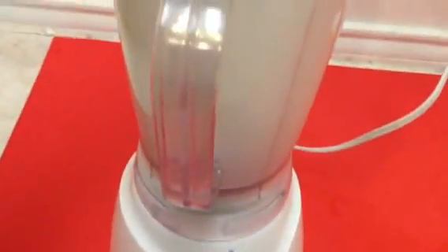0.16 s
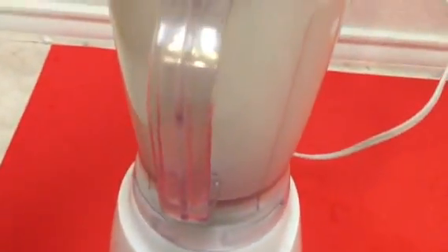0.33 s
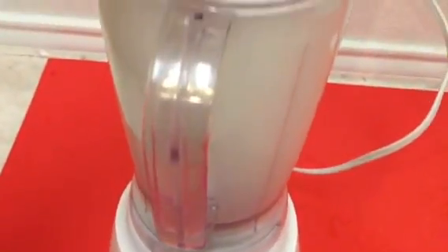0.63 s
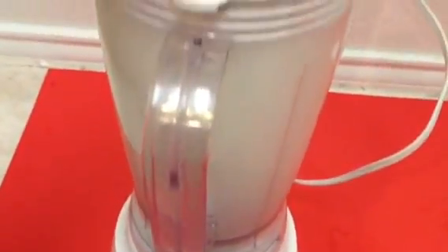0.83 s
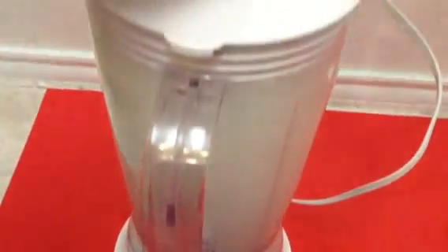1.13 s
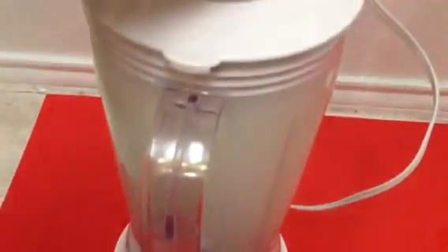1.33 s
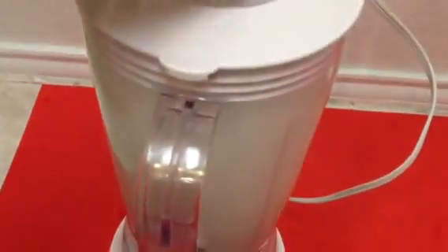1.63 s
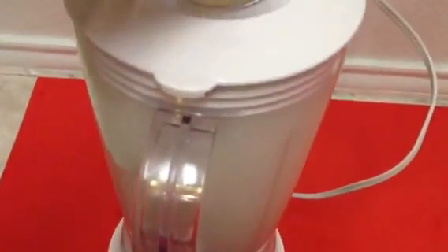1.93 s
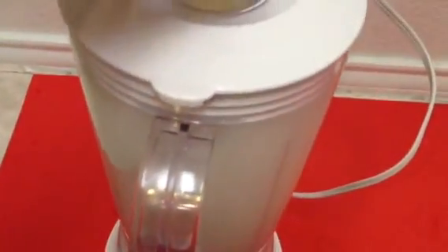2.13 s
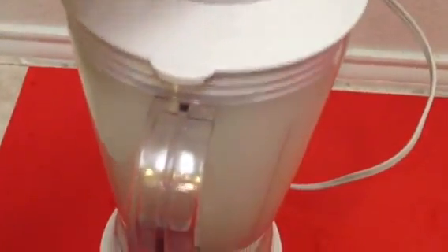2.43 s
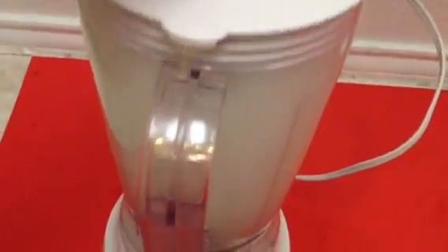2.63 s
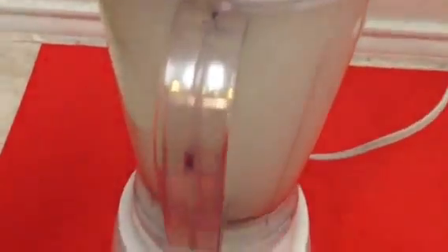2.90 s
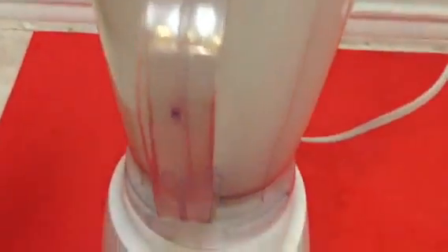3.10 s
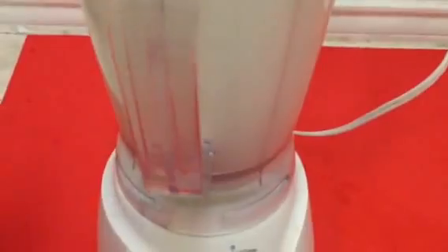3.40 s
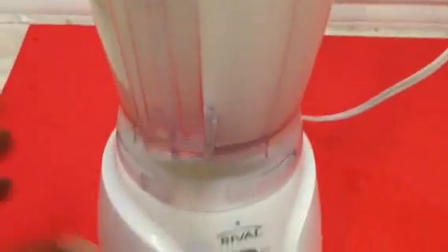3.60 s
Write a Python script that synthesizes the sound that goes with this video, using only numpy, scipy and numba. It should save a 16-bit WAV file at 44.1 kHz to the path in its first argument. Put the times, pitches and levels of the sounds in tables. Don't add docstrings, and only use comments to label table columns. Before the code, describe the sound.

A countertop blender runs steadily close by, motor whining over a loud rushing churn of liquid.

```python
import sys
import numpy as np
from scipy import signal
from scipy.fft import rfft, irfft
from scipy.io import wavfile
from scipy.ndimage import uniform_filter1d
from numba import njit

SR = 44100
rng = np.random.default_rng(int(sys.argv[2]) if len(sys.argv) > 2 else 0)


def transcribe(signal):
    frames = np.atleast_2d(signal).T
    limited = np.clip(frames, -1, 1)
    pcm = np.round(limited * 32767).astype(np.int16)
    wavfile.write(sys.argv[1], SR, pcm)


def to_linear_factor(level_db):
    exponent = np.asarray(level_db, float) / 20
    return 10 ** exponent


N = 165375


def unit(x):
    return x / np.sqrt(np.mean(x ** 2))


@njit
def svf(x, hz, width):
    y, band, low = np.empty(len(x)), 0., 0.
    for i in range(len(x)):
        g = np.tan(np.pi * hz[i] / SR)
        damping = width / hz[i]
        v = (band + g * (x[i] - low)) / (1 + g * (g + damping))
        band, low = 2 * v - band, low + 2 * g * v
        y[i] = damping * v
    return y


def walk(rate):
    hold = int(SR / rate)
    held = rng.standard_normal(400)[np.arange(N) // hold % 400]
    return unit(uniform_filter1d(uniform_filter1d(held, hold), hold))


def quick(rate):
    w = walk(rate)
    return unit(w - uniform_filter1d(w, int(4 * SR / rate)))


def whine(turn, ripple, load, near):
    # multiple of shaft speed, level in dB, rise under load in dB,
    # ripple sidebands in dB, rise near the motor base in dB
    shaft_orders = [(1, -43.5, 3, -29, 0), (2, -39, 5, -6.5, -1), (3, -48, 5, 1.5, -2.5),
                    (4, -43.5, -0.5, 5, 0), (5, -26.5, 2, -12, 5), (6, -30, -2.5, -26, -1),
                    (7, -34, -1.5, -9, -6.5), (8, -35.5, -8.5, -12, 0), (9, -37, 0, -14.5, -3)]
    hum = to_linear_factor(-59.5) * np.sin(ripple)
    sum_tone = to_linear_factor(-38.5 + 3.0 * walk(8)) * np.sin(turn + ripple)
    out = hum + sum_tone
    for order, db, load_db, side_db, near_db in shaft_orders:
        tone_phase, beat_phase = rng.uniform(0, 2 * np.pi, size=2)
        jitter = (.2 + .04 * order) * walk(30.02)
        tone = np.sin(order * turn + tone_phase + jitter)
        beat = 1 + 2 * to_linear_factor(side_db + 2.3 * quick(16)) * np.cos(ripple + beat_phase)
        flutter_db = min(1.0 + .5 * order, 2.9) * quick(18)
        out = out + to_linear_factor(db + load_db * load + near_db * near + flutter_db) * tone * beat
    return np.sqrt(2) * out


def spray(gate):
    size_db = 0.5 * rng.exponential(size=N)
    return unit(rng.standard_normal(N) * to_linear_factor(size_db)) * gate


def rush(gate, churn_db):
    # frequency in Hz, spectral density in dB per Hz
    spectrum = np.array([(60, -71), (230, -20), (650, -18.5), (980, -4.5), (1300, -8), (4900, -11),
                         (5300, -14.5), (15000, -22)])
    patch_db, flicker_db = 0, 1.0
    hz = np.maximum(np.arange(N // 2 + 1) * SR / N, 1)
    shape_db = np.interp(np.log(hz), np.log(spectrum[:, 0]), spectrum[:, 1])
    spec = rfft(spray(gate)) * to_linear_factor(shape_db)
    place = np.clip(np.log2(hz / 60) * 2, 0, 17)
    out, patch = 0, quick(40)
    for k in range(18):
        patch = unit(patch + .5 * quick(39.77))
        share = np.clip(1 - abs(place - k), 0, 1)
        slosh_db = min(k / 16.7, 1) * churn_db
        level_db = slosh_db + patch_db * patch + flicker_db * quick(29.86)
        out = out + irfft(spec * share, N) * to_linear_factor(level_db)
    return unit(out)


def body(gate, churn_db):
    # frequency in Hz, width in Hz, level in dB, change as the phone lifts in dB,
    # change as it swings round in dB
    modes = [(691, 120, -18.5, -5, 7), (2980, 1100, -14.5, -2, -4), (993, 163, -2, 0.5, -0.5),
             (1144, 67, 0, -0.5, 1.5), (1478, 245, -9, 3.5, 2.5), (1849, 61, -2, 0.5, 0),
             (2180, 216, -4.5, 1, 1.5), (3960, 140, -5, 1, -2), (4580, 135, -3.5, -1, 0),
             (5960, 320, -18.5, -1, 3.5), (6767, 220, -14.5, -5.5, -1), (7340, 190, -15, 5.5, 0),
             (11400, 200, -15, -3, -1), (13060, 2800, -20, 0, -0.5)]
    # time in seconds, lift of the phone up the jar from -1 to 1
    lift_path = [
        (0, -0.94),
        (.8, -0.3),
        (1.6, 0.68),
        (2.25, 0.9),
        (2.8, -0.11),
        (3.75, -0.87),
    ]
    t, out = np.arange(N) / SR, 0
    lift = np.interp(t, *np.array(lift_path).T)
    swing = np.tanh((t - 1.7) / 1.1)
    for hz, width, db, lift_db, swing_db in modes:
        centre = hz * (1 + 0.008 * walk(3.42))
        ring = unit(svf(svf(spray(gate), centre, 1.17 * width), centre, 1.17 * width))
        phone_db = lift_db * lift + swing_db * swing
        flicker_db = .5 * walk(2.73) + 1.0 * quick(45)
        out = out + ring * np.sqrt(width) * to_linear_factor(db + 0.8 * churn_db + phone_db + flicker_db)
    return unit(out)


def jar_wall(x, near):
    # frequency in Hz, width in Hz, depth from 0 to 1
    cancellations = [(487, 13, 0.2), (1314, 105, 0.47), (1426, 67, 0.46), (1735, 180, 0.27),
                     (5260, 210, 0.28), (6170, 220, 0.6), (7570, 220, 0.17), (9900, 900, 0.17),
                     (14900, 900, .3)]
    for hz, width, depth in cancellations:
        strength = np.clip(depth * (1 + 0.21 * walk(1.84)), 0, 1)
        centre = hz * (1 + 0.0045 * near + 0.0017 * walk(1.1))
        x = x - strength * svf(x, centre, 1. * width)
    return x


def dropouts(x):
    treble_bands = [5300, 6150, 7800, 9400, 13700, 14200, 14500, 14750, 14950]
    for hz in treble_bands:
        bias = -.8 + (hz > 14000) * .7
        gone = np.clip(3 * (walk(14) + bias), 0, 1)
        centre = hz * (1 + .01 * walk(2))
        for _ in range(2):
            x = x - gone * svf(x, centre, 170 * hz / 14000)
    return x


def scene():
    # time in seconds, churn level in dB
    churn = np.array([(0.0, -14.5), (0.03, -13), (0.06, -15), (0.19, -10.5), (0.4, -15), (0.48, -12.5),
                      (0.79, -14), (1.49, -12), (1.57, -15.5), (1.88, -11), (1.91, -16), (2.08, -12.5),
                      (2.23, -14), (2.74, -10.5), (2.76, -15), (3.02, -12.5), (3.71, -13), (3.75, -12)])
    # time in seconds, nearness of the phone to the motor base from -1 to 1
    height = [
        (0, 0.54),
        (.6, 0.56),
        (1.7, 0.86),
        (2.2, -0.26),
        (2.6, -0.74),
        (3.2, 0.32),
        (3.75, -0.6),
    ]
    shaft_hz, surge_hz, surge_depth_hz, ripple_hz = 227.7, 3.9, 3.69, 120
    slowest_s = 0.0804
    rush_db, body_db = -13.5, -15
    t = np.arange(N) / SR
    load = np.cos(2 * np.pi * surge_hz * (t - slowest_s))
    speed_hz = shaft_hz - surge_depth_hz * load + 0.6064 * walk(6.5)
    turn = 2 * np.pi * np.cumsum(speed_hz) / SR
    ripple = 2 * np.pi * ripple_hz * t
    churn_db = np.interp(t, churn[:, 0], churn[:, 1] - churn[:, 1].mean()) + 0.5 * quick(60)
    near = np.interp(t, *np.array(height).T)
    rasp = to_linear_factor(0.5 * quick(160))
    gate = (1 + 0.098 * np.cos(ripple)) * (1 + 0.073 * np.cos(turn)) * rasp
    mono = whine(turn, ripple, load, near)
    mono = mono + to_linear_factor(rush_db) * rush(gate, churn_db)
    mono = mono + to_linear_factor(body_db) * body(gate, churn_db)
    mono = jar_wall(mono, near)
    return np.array([mono, mono])


def band_limit(x):
    return signal.sosfilt(signal.butter(12, 15280, fs=SR, output="sos"), x)


def record(dry):
    soft = dropouts(np.tanh(.75 * dry[0]) / .75)
    bass_cut = signal.butter(2, 137, "high", fs=SR, output="sos")
    top_cut = signal.ellip(10, .2, 90, 15300, fs=SR, output="sos")
    cut = signal.sosfilt(top_cut, signal.sosfilt(bass_cut, soft))
    return band_limit(np.clip([cut, cut], -1, 1))


dry = scene()
out = record(dry)
transcribe(out)
```